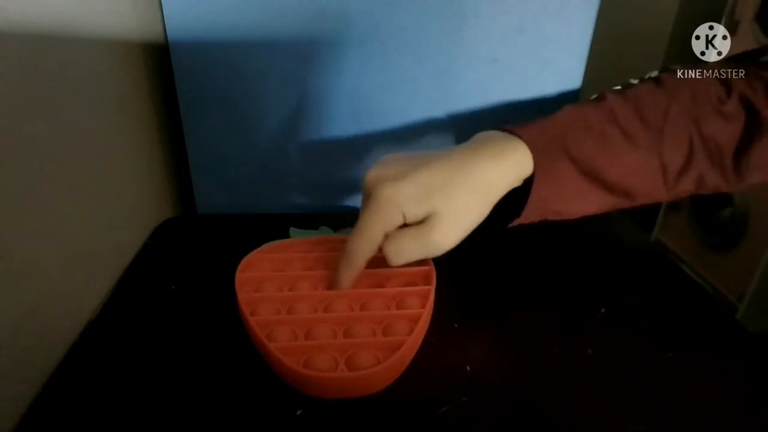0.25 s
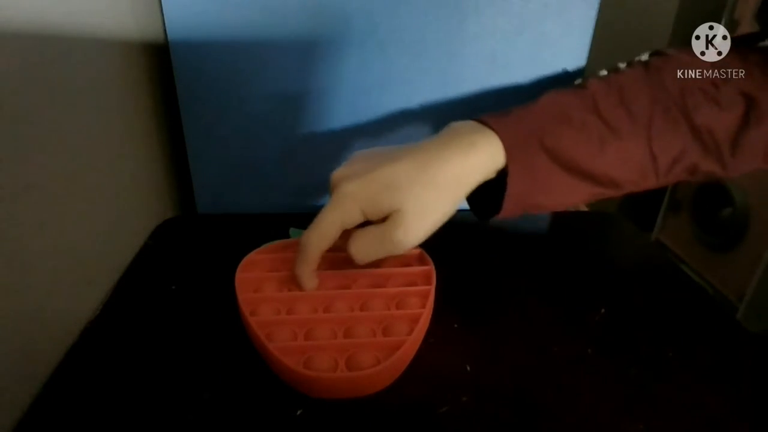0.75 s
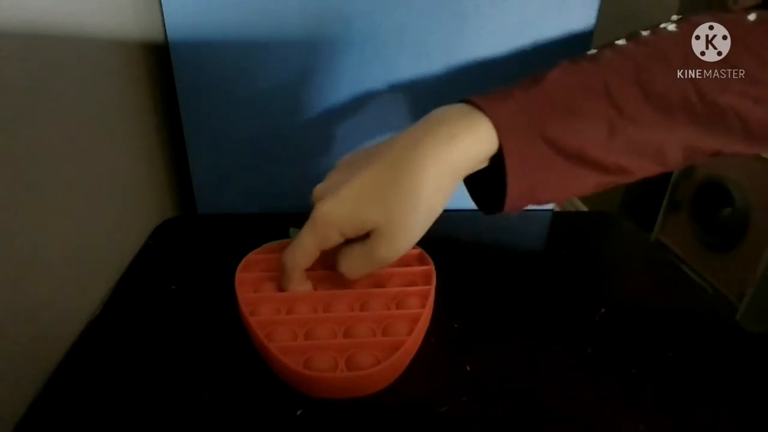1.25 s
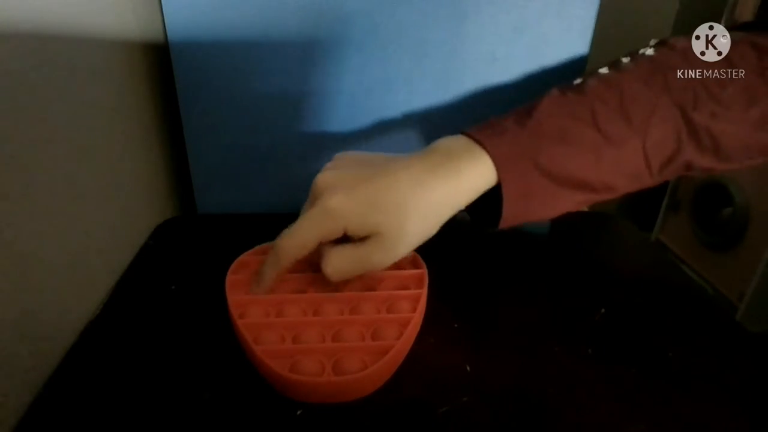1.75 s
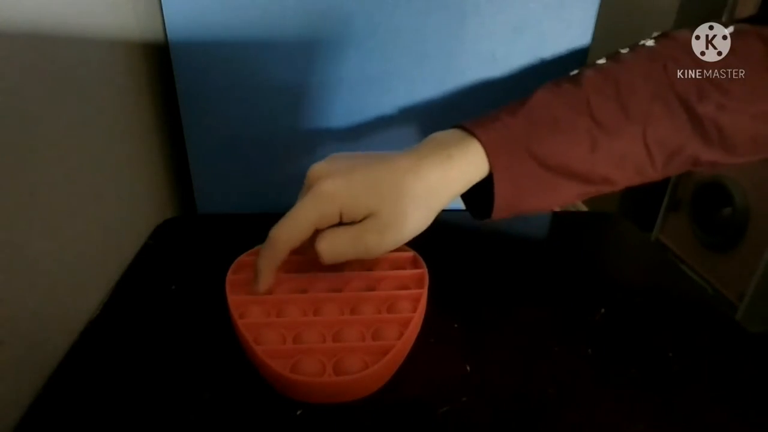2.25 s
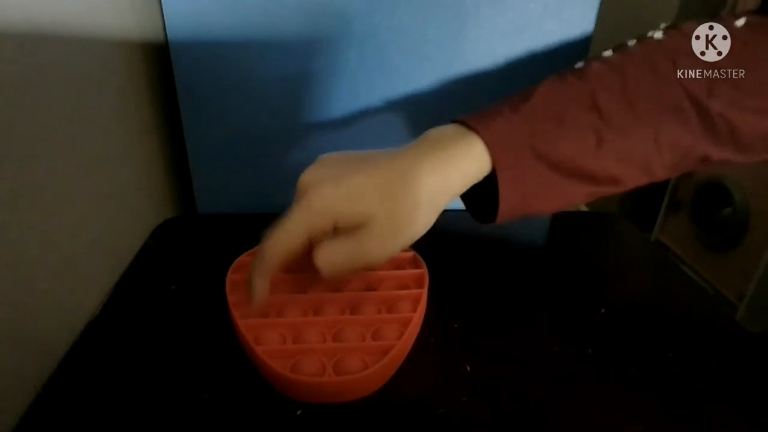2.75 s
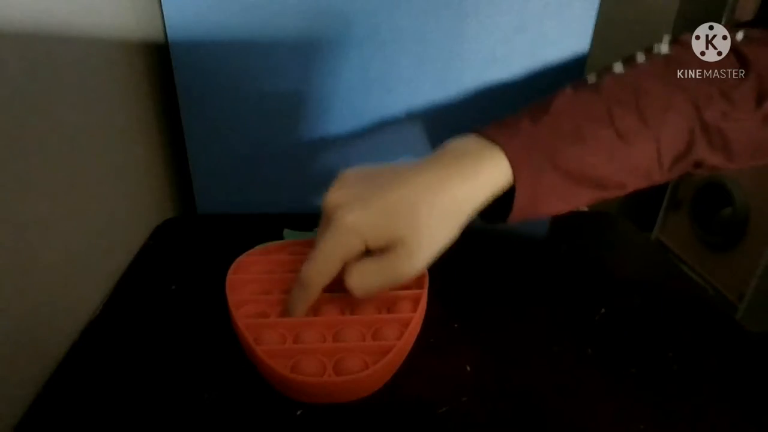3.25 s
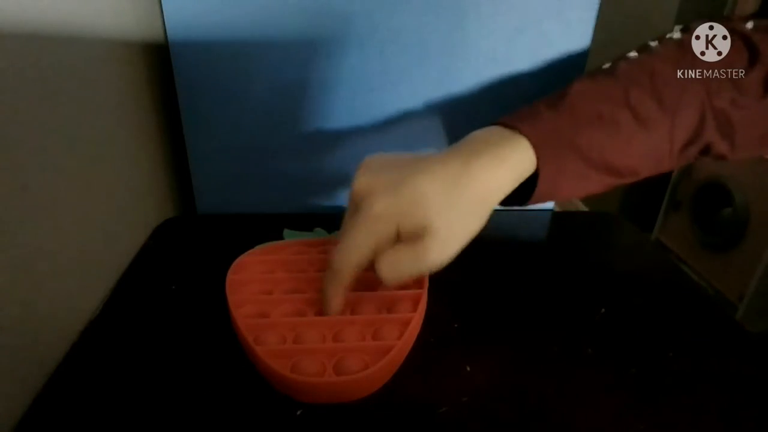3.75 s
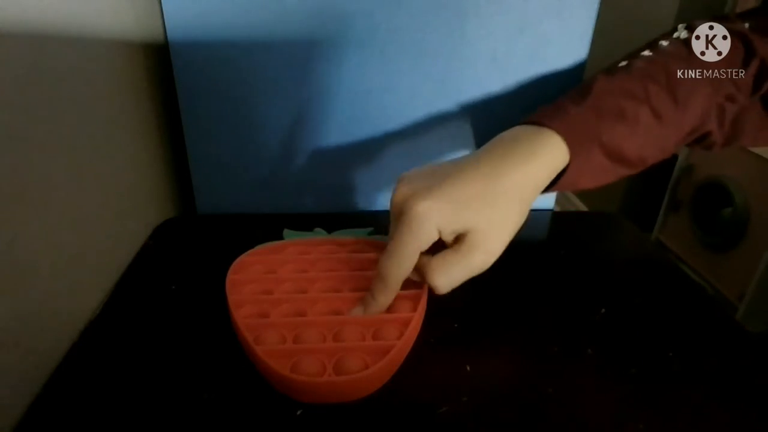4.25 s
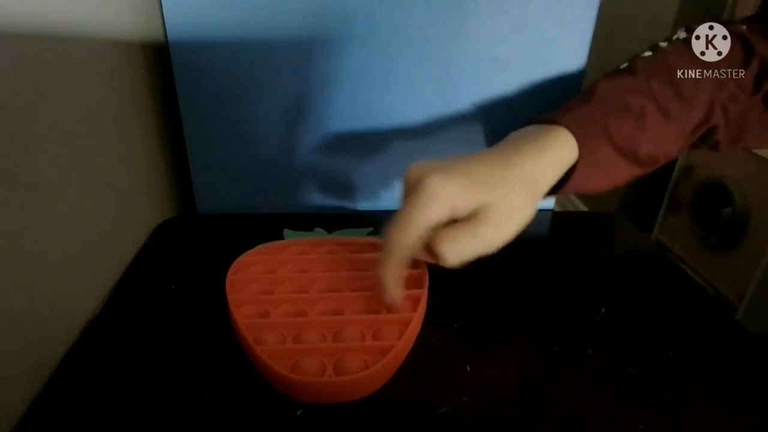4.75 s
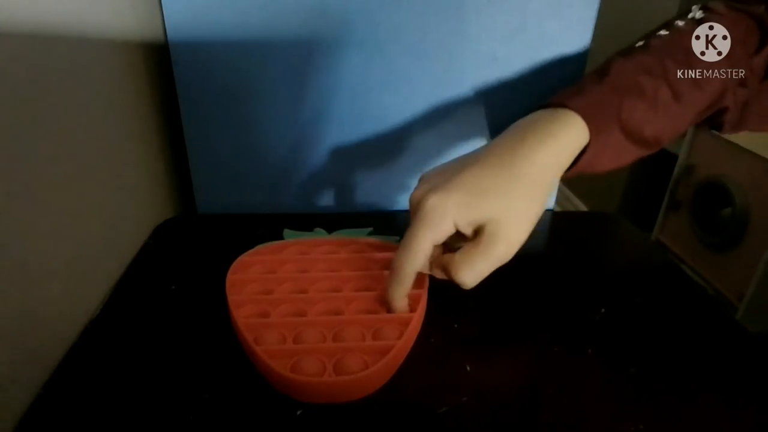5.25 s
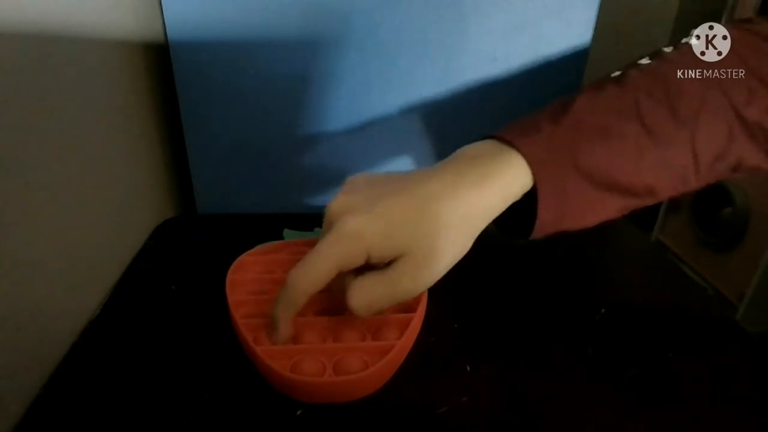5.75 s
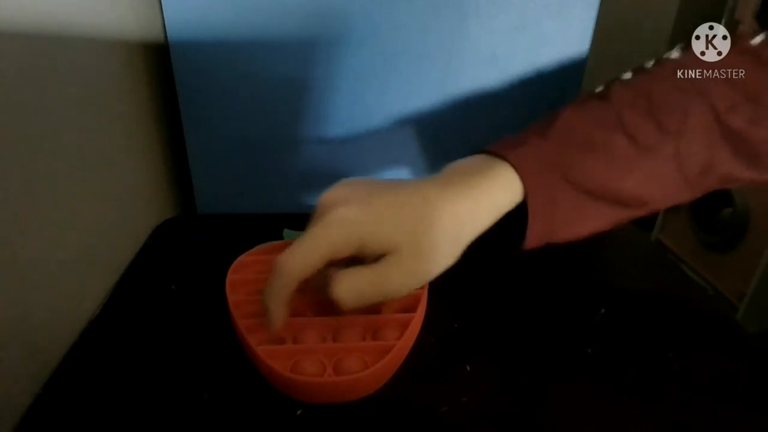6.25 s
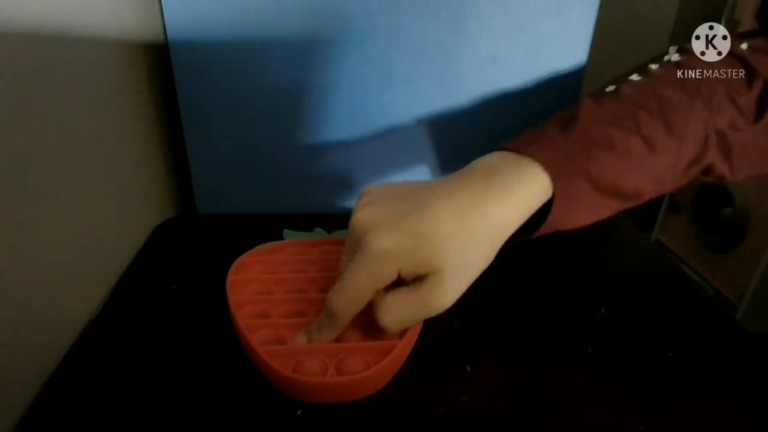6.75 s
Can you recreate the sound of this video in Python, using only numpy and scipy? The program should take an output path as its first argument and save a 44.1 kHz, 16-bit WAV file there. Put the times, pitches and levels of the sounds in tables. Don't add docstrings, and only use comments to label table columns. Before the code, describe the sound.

A fingertip presses the silicone bubbles of a fidget toy, giving sharp hollow pops with low table thuds, light taps and sticky ticks over hiss.

```python
import sys
import numpy as np
from scipy import signal
from scipy.fft import rfft, irfft
from scipy.io import wavfile
from scipy.ndimage import uniform_filter1d

SR = 44100
rng = np.random.default_rng(int(sys.argv[2]) if len(sys.argv) > 2 else 0)


def generate_wav(signal):
    frames = np.transpose(np.atleast_2d(signal))
    scaled = np.clip(frames, -1, 1) * 32767
    pcm = np.round(scaled).astype(np.int16)
    wavfile.write(sys.argv[1], SR, pcm)


def to_linear_factor(level_db):
    exponent = np.asarray(level_db, float) / 20
    return 10 ** exponent


N = 309130


def rms_one(x):
    return x / np.sqrt(np.mean(x ** 2) + 1e-20)


def at_hz(points, hz):
    point_hz, value = np.transpose(points)
    return np.interp(np.log(np.maximum(hz, 1)), np.log(point_hz), value)


def add(out, start_s, sound):
    i = int(round(start_s * SR))
    out[i:i + len(sound)] += sound[:N - i]


def tone(hz, t):
    return np.sin(2 * np.pi * hz * t)


def dying(t, t60_s):
    return to_linear_factor(-60 * t / np.maximum(t60_s, 0.002))


def band_pass(x, order, low_hz, high_hz):
    return signal.sosfilt(signal.butter(order, [low_hz, high_hz], "band", fs=SR, output="sos"), x)


def taut(t, sag=0.038, settle_s=0.0059):
    return t + sag * settle_s * (1 - np.exp(-t / settle_s))


def hiss():
    # hz, level_db (per Hz)
    spectrum = [(12, -33), (20, 6.5), (87, -13.5), (136, -9.5), (490, -20), (4790, -30.5), (14200, -29.5),
                (15400, -23)]
    hz = np.arange(N // 2 + 1) * SR / N
    shaped = rfft(rng.standard_normal(N)) * to_linear_factor(at_hz(spectrum, hz))
    return to_linear_factor(-41) * rms_one(irfft(shaped, N))


def building_drone():
    # pitch_hz, width_hz, level_db
    drone = (58.5, 6, -41)
    hz, width_hz, level_db = drone
    r = np.exp(-np.pi * width_hz / SR)
    white = rng.standard_normal(N + SR)
    ringing = signal.lfilter([1, 0, -1], [1, -2 * r * np.cos(2 * np.pi * hz / SR), r * r], white)
    return to_linear_factor(level_db) * rms_one(ringing[SR:])


def loose_panel():
    # start_s, level_db, t60_s
    hums = [
        (0.0, -38, 1.3),
        (0.34, -32, 1.15),
        (1.48, -34, 1.05),
        (1.92, -33, 5.6),
        (2.66, -34, 2),
        (3.265, -28, 2.1),
        (3.72, -34, 3.5),
        (5.0, -45, 8),
        (5.32, -40.5, 4.7),
        (6.43, -47, 3.0),
    ]
    start_s, level_db, t60_s = np.transpose(hums)
    t = np.arange(N) / SR
    last = np.maximum(np.searchsorted(start_s, t) - 1, 0)
    level = to_linear_factor(level_db[last]) * dying(t - start_s[last], t60_s[last])
    swell_s = 0.032
    return uniform_filter1d(level, int(swell_s * SR)) * tone(98.0, t)


def walls(x):
    # delay_s, level_db
    echoes = [
        (.0095, -13.5),
        (0.0265, -33),
    ]
    out = np.zeros(N)
    dull = band_pass(x, 2, 700, 1500)
    for delay_s, level_db in echoes:
        add(out, delay_s, to_linear_factor(level_db) * dull)
    return out


def room(x, build_s=0.003):
    # hz, t60_s
    fading = [(100, 0.97), (500, 0.16), (1500, 0.2), (2300, 0.18), (3300, 0.19), (6000, 0.48),
              (12000, 0.25)]
    # hz, level_db
    colour = [(100, -14.5), (400, -18), (1000, -6.5), (2000, -10.5), (3200, -17.5), (6000, -28.5),
              (12000, -17.5)]
    t = np.arange(SR // 2) / SR
    white = rng.standard_normal((2, len(t)))
    tail = np.zeros(len(t))
    edges_hz = 90 * 2 ** np.arange(0, 7.6, 0.5)
    for k, (low, high) in enumerate(zip(edges_hz, edges_hz[1:])):
        band = band_pass(white[k % 2], 2, low, high)
        hz = np.sqrt(low * high)
        tail += to_linear_factor(at_hz(colour, hz) - 18.0) * band * dying(t, at_hz(fading, hz))
    tail *= np.minimum(t / build_s, 1) ** 2
    return signal.fftconvolve(x, tail)[:N]


def table():
    # start_s, boom_db, upper_db
    pushes = [(0.0, -28, -31.5), (0.014, -13.5, -31.5), (0.273, -17.5, -30.5), (0.344, -12.5, -26.5),
              (0.615, -27, -41.5), (0.699, -31.5, -60), (1.252, -27, -45), (1.463, -42, -54),
              (1.489, -26, -29.5), (1.925, -23, -28), (1.935, -10.5, -15), (2.118, -24.5, -48),
              (2.662, -9.5, -23.5), (2.807, -19.5, -43.5), (3.263, -7, -15), (3.596, -26, -42),
              (3.692, -34, -16.5), (3.703, -10, -8.5), (4.005, -22.5, -36.5), (4.191, -31.5, -38),
              (4.466, -23, -51), (4.534, -16.5, -55), (5.067, -24, -36), (5.323, -14.5, -39),
              (5.473, -36, -33.5), (5.704, -33, -38), (5.889, -38, -42.5), (6.106, -18.5, -27),
              (6.421, -19, -38.5), (6.617, -29, -63)]
    # pitch_hz, level_db, t60_s
    boom_modes = [
        (79.55, 1, 0.48),
        (84.5, -32, 0.13),
    ]
    # pitch_hz, level_db, t60_s
    upper_modes = [(144, -0.5, 0.25), (164.4, -1.5, 0.079), (207.9, -9, 0.17), (230.5, -8.5, 0.17),
                   (313.7, -10.5, 0.16)]
    contact_s = 0.0016
    out, t = np.zeros(N), np.arange(SR) / SR
    swell = 1 - np.exp(-t / contact_s)
    boom = sum(to_linear_factor(db) * tone(hz, t) * dying(t, t60_s) for hz, db, t60_s in boom_modes)
    chance = 1.93 * rng.standard_normal((len(pushes), len(upper_modes)))
    for (start_s, boom_db, upper_db), change_db in zip(pushes, chance):
        upper = np.zeros(len(t))
        for (hz, db, t60_s), change in zip(upper_modes, change_db):
            upper += to_linear_factor(db + change) * tone(hz, t) * dying(t, t60_s)
        add(out, start_s, swell * (to_linear_factor(boom_db - 4.5) * boom + to_linear_factor(upper_db + 3.5) * upper))
    return out


def rubs():
    # start_s, length_s, scuff_db, hiss_db, drag_db
    strokes = [(0.124, 0.04, -42, -43, -39.5), (0.468, 0.056, -44, -42, -48),
               (0.596, 0.022, -40.5, -48, -36.5), (1.433, 0.01, -29, -30, -38),
               (1.443, 0.078, -36, -37.5, -28.5), (1.635, 0.077, -41.5, -53, -40),
               (1.687, 0.036, -33.5, -54, -36.5), (2.792, 0.055, -39.5, -36, -34.5),
               (3.842, 0.038, -42.5, -43.5, -36.5), (4.326, 0.058, -44.5, -56, -63),
               (4.46, 0.076, -46.5, -41.5, -44.5), (4.54, .035, -46.5, -44, -35.5),
               (4.737, 0.032, -46, -42, -42), (4.875, 0.019, -48, -49, -44), (4.904, 0.033, -41, -49, -42),
               (5.01, .06, -47.5, -56, -54), (5.3, 0.051, -39, -34.5, -25.5),
               (5.503, 0.057, -43, -46.5, -39.5), (5.877, 0.052, -58, -59, -43),
               (6.416, 0.054, -42.5, -50, -35)]
    press = 0.28
    t = np.arange(N) / SR
    clumps = rms_one(uniform_filter1d(rng.standard_normal(N), size=120))
    grains = rng.standard_normal(N) * to_linear_factor(2.5 * clumps)
    scuff = rms_one(band_pass(grains, 2, 1000, 3400))
    bright = rms_one(band_pass(grains, 2, 5500, 9400))
    drag = rms_one(band_pass(grains, 2, 123, 580))
    out = np.zeros(N)
    for start_s, length_s, scuff_db, hiss_db, drag_db in strokes:
        pressing = (t - start_s) / press
        lifting = (start_s + length_s - t) / (1 - press)
        touch = np.clip(np.minimum(pressing, lifting) / length_s, 0, 1)
        out += touch * (to_linear_factor(scuff_db) * scuff + to_linear_factor(hiss_db) * bright + to_linear_factor(drag_db) * drag)
    return out


def ticks(width=0.19):
    # start_s, peak_db, centre_hz, t60_s
    peels = [(0.0169, -11.5, 7500, 0.016), (0.132, -25, 9150, 0.029), (0.162, -29, 6100, 0.028),
             (0.3465, -7, 6800, 0.017), (0.4597, -31, 13500, 0.02), (0.487, -32, 6500, 0.033),
             (1.4315, -6.5, 8660, 0.013), (1.4517, -17, 8110, 0.03), (1.693, -16.5, 6900, 0.017),
             (1.9225, -26.5, 6100, 0.027), (1.935, -20, 12500, 0.019), (2.118, -16.5, 9500, 0.022),
             (2.674, -19.5, 8460, 0.0097), (2.807, -14, 9000, 0.0098), (3.2632, -8.5, 5440, 0.018),
             (3.3981, -18.5, 10900, 0.022), (3.6914, -16, 5500, 0.032), (3.6996, -12, 6650, 0.015),
             (3.85, -26, 6940, 0.048), (4.1957, -23.5, 5340, 0.014), (4.4705, -39, 8500, 0.02),
             (4.4865, -24.5, 7350, 0.043), (4.5544, -29, 8750, 0.027), (4.7478, -29.5, 7100, 0.075),
             (4.9447, -31.5, 7100, 0.025), (5.108, -24.5, 11500, 0.026), (5.3148, -16, 6530, 0.024),
             (6.106, -19, 5700, 0.014), (6.2773, -29, 5960, 0.049), (6.4278, -24, 7400, 0.016)]
    out, t = np.zeros(N), np.arange(SR // 10) / SR
    shape = (len(peels), len(t))
    grains = rng.standard_normal(shape) * to_linear_factor(8.3 * rng.standard_normal(shape))
    for (start_s, peak_db, hz, t60_s), grain in zip(peels, grains):
        low, high = np.clip([hz * (1 - width / 2), hz * (1 + width / 2)], 2000, 15000)
        core = rms_one(band_pass(grain, 2, low, high))
        broad = rms_one(band_pass(grain[::-1], 3, 6000, 15000))
        rise = np.minimum(t / t60_s / 0.1, 1)
        add(out, start_s, to_linear_factor(peak_db - 7.0) * (core + to_linear_factor(2.0) * broad) * dying(t, t60_s) * rise)
    return out


def knocks(rise_s=0.00052, lag_s=0.001776):
    # start_s, peak_db, pitch_hz, overtone_db
    hits = [(0.015, -4, 547, -22), (0.273, -16, 340, -20.5), (0.309, -18, 430, -24),
            (0.345, -3.5, 623, -7.5), (0.609, -26.5, 477, -36), (1.257, -13.5, 593, -20),
            (1.492, -23, 360, -46), (1.694, -24, 437, -35), (1.921, -5, 475, -32), (1.935, -25, 330, -14),
            (2.118, -39, 272, -39), (2.649, -16.5, 432, -19), (2.675, -22.5, 280, -47),
            (2.806, -29.5, 293, -36), (5.506, -26.5, 251, -48), (3.265, -6, 421, -13),
            (3.271, -9, 405, -32), (3.601, -21, 336, -32), (3.691, -7.5, 420, -11.5),
            (3.848, -34, 340, -37), (4.001, -24, 345, -32.5), (4.468, -20, 502, -33), (4.75, -34, 322, -41),
            (5.066, -29.5, 450, -38), (5.314, -12.5, 550, -38), (5.702, -30, 538, -34),
            (5.887, -23.5, 554, -26.5), (6.105, -14, 346, -14), (6.106, -9, 530, -16),
            (6.429, -34.5, 304, -39)]
    # pitch_hz, t60_s
    frame = (884, 0.013)
    frame_hz, frame_t60_s = frame
    out, t = np.zeros(N), np.arange(SR // 8) / SR
    rise = np.minimum(t / rise_s, 1)
    detune = 1 + 0.07 * rng.standard_normal(len(hits))
    for (start_s, peak_db, hz, over_db), k in zip(hits, detune):
        low = to_linear_factor(peak_db + 8.0) * tone(hz, taut(t)) * dying(t, 5.8 / hz)
        high = to_linear_factor(over_db + 7.0) * tone(frame_hz * k, taut(t)) * dying(t, frame_t60_s)
        add(out, start_s + lag_s, -rise * (low + high))
    return out


def pops(rise_s=0.0008, cycles=19.0, haste=5.85):
    # start_s, ring_db, dome_hz, rim_db, rim_hz
    snaps = [(0.017, -2, 1304, -9, 2115), (0.274, -19.5, 1290, -40, 2050), (0.311, -14, 1310, -33, 1920),
             (0.347, -1.5, 1230, -9.5, 2114), (1.2587, 2, 1297, -11.5, 2140), (1.432, -24, 1330, -30, 3110),
             (1.491, -27, 1430, -35, 2200), (1.695, -24.5, 1370, -47, 2170), (1.923, -13, 1410, -15, 2900),
             (1.9355, -10, 1360, -18, 3000), (2.116, -37, 1240, -32, 2710),
             (2.649, -16.5, 1370, -34.5, 2440), (3.263, 2, 1466, -23, 2650), (3.264, -5.5, 945, 4, 2717),
             (3.599, -32, 1280, -33, 2620), (3.692, -14, 1310, -14, 2710), (3.7, -2, 1540, -1, 1790),
             (3.704, -8.5, 890, -16, 2130), (4.1965, -31.5, 883, -33.5, 2900),
             (5.316, -26, 870, -28.5, 1870), (5.474, -45, 885, -28.5, 2130), (5.889, -23, 1600, -37, 1790),
             (6.1065, 1, 1498, -17.5, 2520), (6.1075, -4.5, 1096, -37, 1850)]
    # start_s, ring_db, dome_hz, rim_db
    more_snaps = [(0.134, -30.5, 1290, -38), (0.164, -27.5, 1270, -28), (0.27, -26, 1500, -32),
                  (0.46, -33.5, 1330, -41), (0.604, -50, 1100, -56), (1.454, -30.5, 920, -41),
                  (1.543, -35.5, 1300, -55), (1.742, -36, 1300, -41), (2.577, -44, 694, -46),
                  (2.673, -33, 880, -37.5), (2.805, -30.5, 1380, -50), (3.109, -44, 594, -44),
                  (3.398, -39.5, 1000, -36.5), (3.846, -35, 1000, -53), (4.001, -29, 1350, -44),
                  (4.346, -39, 1350, -54), (4.472, -45, 1000, -59), (4.757, -37, 1300, -51),
                  (4.878, -38.5, 1100, -43), (4.924, -31.5, 1630, -48), (4.946, -48, 1500, -40),
                  (5.066, -33.5, 1000, -52), (5.507, -31.5, 890, -40), (5.703, -37.5, 1270, -44),
                  (5.848, -42, 1050, -39), (6.28, -39, 900, -37), (6.431, -35.5, 950, -37),
                  (6.448, -38, 1140, -54), (6.506, -38.5, 1290, -42.5), (6.886, -37.5, 865, -58)]
    # ratio (to dome_hz), level_db
    side_modes = [
        (.72, -8),
        (1.3, -8),
    ]
    shared_rim_hz = 2216
    near, far, t = np.zeros(N), np.zeros(N), np.arange(SR // 10) / SR
    rows = snaps + [(*pop, shared_rim_hz) for pop in more_snaps]
    detune = 1 + 0.04 * rng.standard_normal((len(rows), 2))
    noises = rms_one(band_pass(rng.standard_normal((len(rows), len(t))), 2, 3500, 4800))
    onset = np.minimum(t / rise_s, 1) ** 2
    for (start_s, ring_db, hz, rim_db, rim_hz), shift, noise in zip(rows, detune, noises):
        ring_s = cycles / hz
        ring = tone(hz, taut(t)) * dying(t, ring_s)
        for (ratio, db), k in zip(side_modes, shift):
            ring += to_linear_factor(db) * tone(ratio * k * hz, taut(t)) * dying(t, ring_s / 2)
        rim_pair = tone(rim_hz, t) + to_linear_factor(-5.5) * tone(0.83 * shift[0] * rim_hz, t)
        rim = to_linear_factor(rim_db + 9.5) * rim_pair * dying(t, 0.013)
        crack = to_linear_factor(rim_db - 2.5) * noise * dying(t, 0.0091)
        add(near, start_s, onset * (to_linear_factor(ring_db + 8) * ring + rim + crack))

        snap = to_linear_factor(ring_db + 18.0) * ring * dying(t, ring_s / haste)
        snap += to_linear_factor(15.5) * rim * dying(t, 0.0022)
        snap += to_linear_factor(-7.5) * crack
        add(far, start_s, onset * snap)
    return near, far


def scene():
    background = hiss() + building_drone() + loose_panel()
    contact = rubs() + ticks() + knocks()
    near, far = pops()
    space = walls(near + contact) + room(far + to_linear_factor(-6.0) * contact)
    return (background + table() + space + contact + near)[None]


def band_limit(x):
    return signal.sosfilt(signal.butter(12, 16620, fs=SR, output="sos"), x)


def record(dry):
    cut = signal.sosfilt(signal.cheby2(14, 60, 15850, fs=SR, output="sos"), dry)
    mix = np.clip(cut, -0.95, 0.95)
    return band_limit(mix)


dry = scene()
out = record(dry)
generate_wav(out)
```